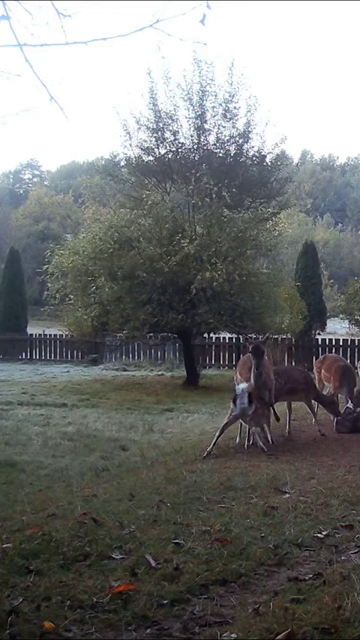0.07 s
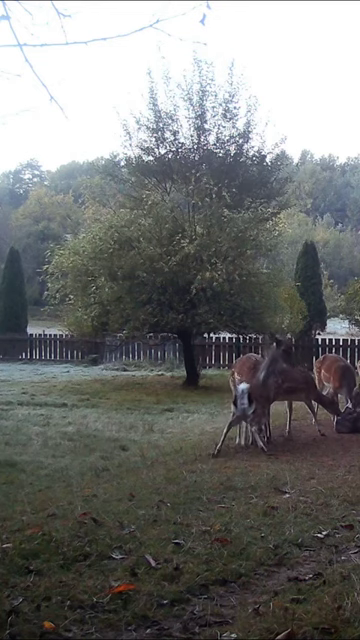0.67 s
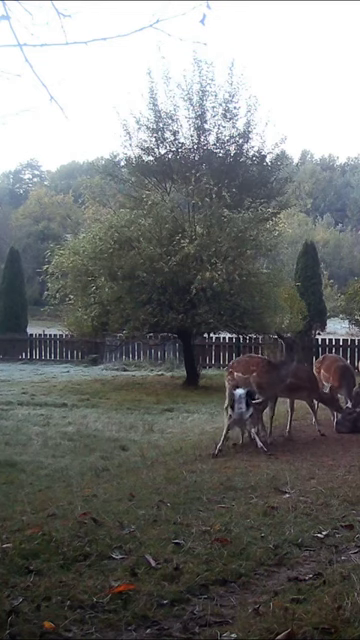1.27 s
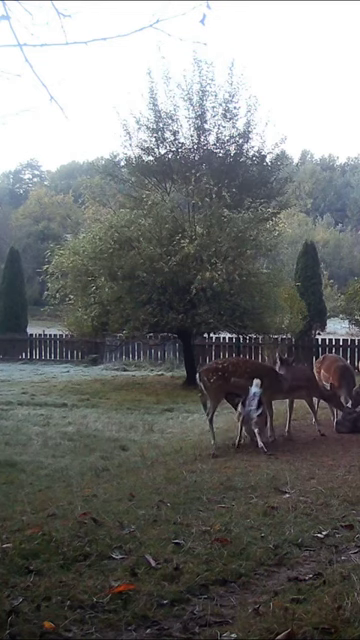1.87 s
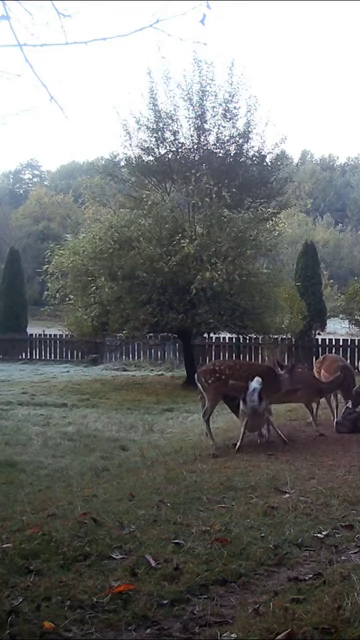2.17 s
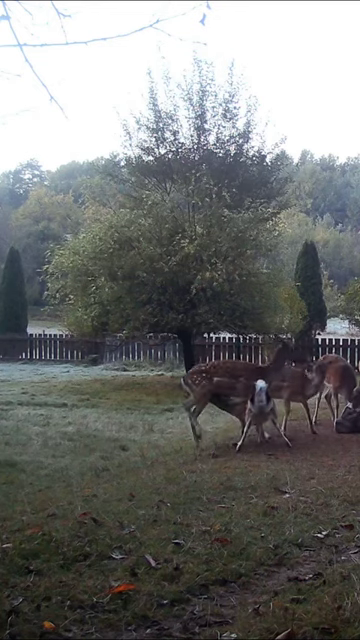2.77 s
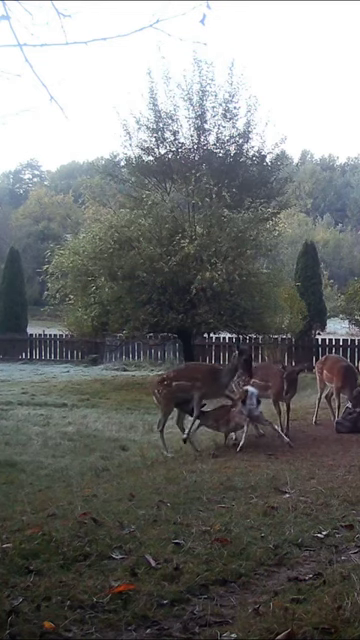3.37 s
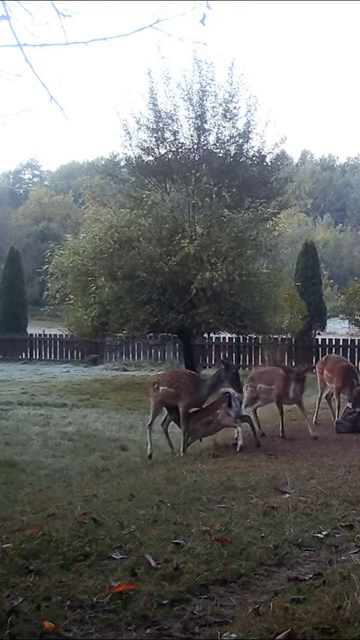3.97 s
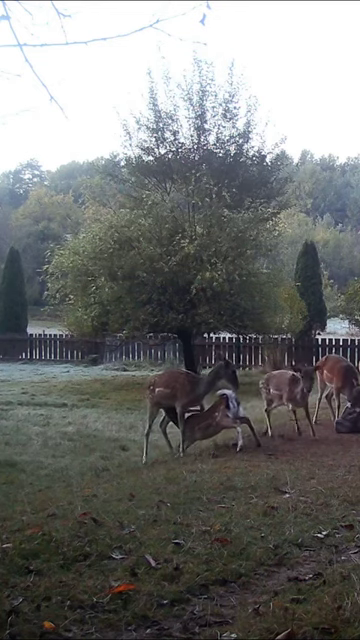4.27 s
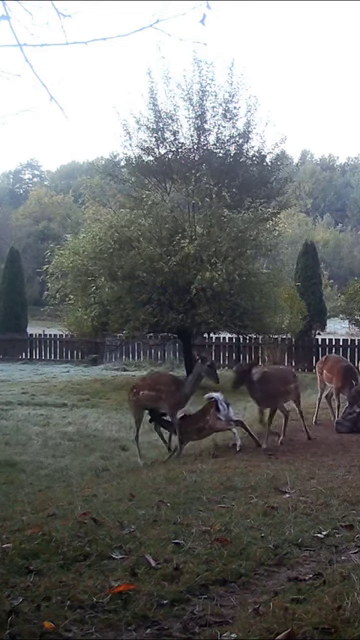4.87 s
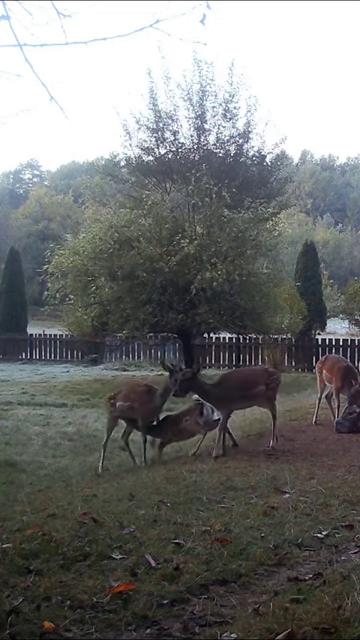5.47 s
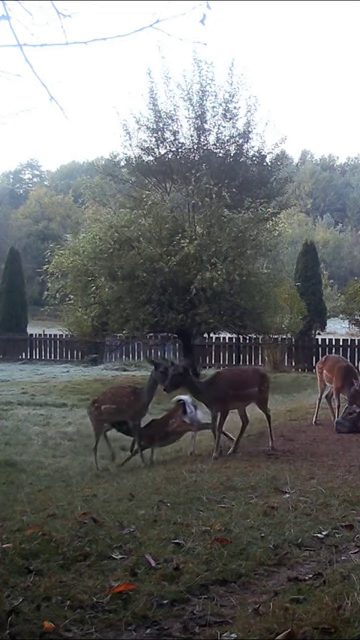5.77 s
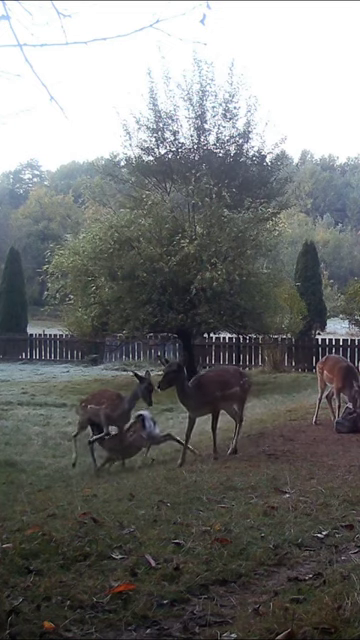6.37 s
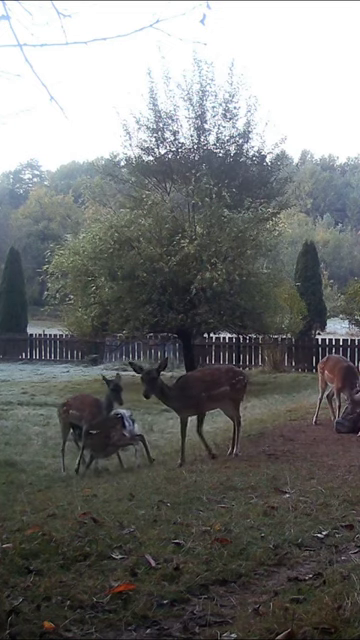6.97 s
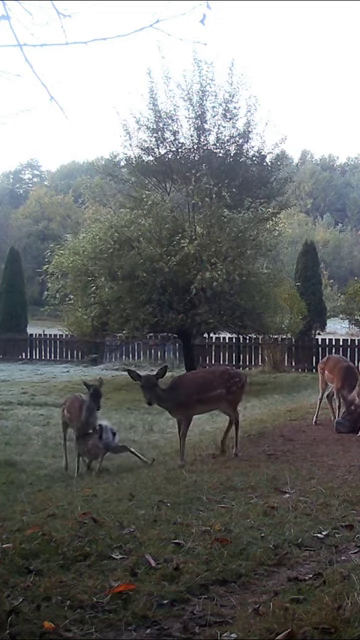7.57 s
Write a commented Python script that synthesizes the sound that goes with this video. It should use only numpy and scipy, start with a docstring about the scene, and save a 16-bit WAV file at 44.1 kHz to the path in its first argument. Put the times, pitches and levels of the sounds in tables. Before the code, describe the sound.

The mono sound fades in during the first second on a still yard: even microphone hiss, distant air and a barely audible high whine. Soft, low thumps from handling and light air on the camera come irregularly, all near one deep pitch, with a slight rumble between them. They are the loudest element, strongest at about 1.7 and 2.2 seconds, continue until 5.4, then weaken and end by 7. Small birds sound faintly from the trees: two quick calls stepping down three notes at 0.5 and 0.7 seconds, and single thin peeps until about 2.4. More peeps and two more stepping calls come between 4.5 and 5.3 seconds. From 5.4 to 6 seconds one bird sings a slightly louder phrase of about seven quick, high, falling notes, echoing lightly off the fence and trees. The hiss carries on to the end, around 7.5 seconds.

```python
"""A hand-held camera throbs softly as handling and light air bump its one low resonance.
Around it lies a still morning on a grassy yard: distant air, even microphone hiss, a faint whine.
Small birds peep and call from the trees in gliding whistles, and late on one sings a short phrase
of falling notes that echoes off the fence and the wood. The scene is mono and fades in."""
import sys
import numpy as np
from scipy import signal
from scipy.fft import rfft, irfft, next_fast_len
from scipy.io import wavfile
from scipy.ndimage import uniform_filter1d, map_coordinates

SR = 44100
rng = np.random.default_rng(int(sys.argv[2]) if len(sys.argv) > 2 else 0)


def unload_wav(signal):
    """Save mono or channel-first audio to the path in sys.argv[1] as 16-bit WAV at rate SR, clipped to [-1, 1]."""
    wavfile.write(
        sys.argv[1],
        SR,
        np.round(np.clip(np.atleast_2d(signal).T, -1, 1) * 32767).astype(np.int16),
    )


N = 340893


def amp(db):
    """Decibels to gain."""
    return 10 ** (np.asarray(db) / 20)


def unit(x):
    """Scale to rms 1."""
    return x / np.sqrt(np.mean(x ** 2) + 1e-20)


def along(points, hz):
    """Read a curve of (freq_hz, value) points on a log frequency axis."""
    freqs, values = np.transpose(points)
    return np.interp(np.log(hz + 1), np.log(freqs + 1), values)


def filtered(x, response):
    """EQ x with a gain given as a function of frequency."""
    size = next_fast_len(N + SR // 2)
    return irfft(rfft(x, size) * response(np.fft.rfftfreq(size, 1 / SR)), size)[:N]


def noise(spectrum):
    """Noise of rms 1 with the given colour."""
    return unit(filtered(rng.standard_normal(N), lambda hz: amp(along(spectrum, hz))))


def wobble(rate_hz):
    """A smooth random curve with rate_hz knots a second."""
    knots = rng.standard_normal(int(N * rate_hz / SR) + 4)
    return map_coordinates(knots, [np.arange(N) * rate_hz / SR])


def add(track, start_s, sound):
    """Mix a sound into the track from start_s."""
    i = round(start_s * SR)
    lo, hi = max(i, 0), min(i + len(sound), N)
    track[lo:hi] += sound[lo - i:hi - i]


def background(air_db=-67, hiss_db=-63.0, drift_hz=3):
    """The bed: distant outdoor air, microphone hiss and a faint, drifting whine of the electronics."""
    # colours of the air and the hiss: freq_hz, relative_db
    air_colour = [(10, -10), (20, 7.5), (40, 7), (74, 12), (95, 4.5), (115, -5.5), (250, -4), (450, -5),
                  (900, -9), (1800, -16), (4000, -30), (8000, -44)]
    hiss_colour = [(100, -7.5), (500, -0.5), (1500, 0), (2900, -0.5), (4100, -0.95), (5200, -1.5),
                   (10300, -3), (12500, -3.5), (13800, -2), (15000, -5.5), (15600, -10)]
    # tones of the whine: pitch_hz, rms_db
    whine_tones = [(11100, -95), (11192, -84.5), (11219, -87)]
    air = amp(air_db + 0.25 * wobble(3.3)) * noise(air_colour)
    hiss = amp(hiss_db + 0.18 * wobble(6.5)) * noise(hiss_colour)
    whine = np.zeros(N)
    for hz, db in whine_tones:
        phase = 2 * np.pi * np.cumsum(hz + drift_hz * wobble(20)) / SR
        whine += amp(db) * unit(np.sin(phase))
    return air + hiss + whine


def bump_pulses(bump_hz=74.6, rebound_hz=71.54, scatter_hz=3.25):
    """Each bump and the grip's rebound, as rows of peak_s, level_db, pitch_hz, rise_s, fall_s."""
    # soft bumps on the camera: peak_s, level_db, rise_s, rebound_db (relative to the bump)
    bumps = [(.125, -38.5, 0.022, -1.5), (.38, -34, 0.016, -25), (.532, -47.5, .03, -15),
             (.96, -39, 0.023, -15.5), (1.302, -50, 0.02, -20), (1.528, -51, .014, -21),
             (1.699, -26, 0.018, -4.5), (2.014, -39, 0.028, -11), (2.157, -29.5, .016, -1),
             (2.403, -33, 0.011, -10), (2.456, -35.5, .02, -14), (2.63, -51.5, 0.046, -9),
             (2.84, -33.5, .015, -8.5), (3.211, -44.5, 0.038, -2), (3.341, -34, .018, -15),
             (3.398, -42, 0.01, -18), (3.643, -33.5, 0.019, -15.5), (4.183, -46, .024, -22),
             (4.341, -33.5, .016, -10), (4.665, -34, 0.022, -13), (4.915, -44.5, 0.021, 1),
             (5.078, -34.5, 0.015, -7), (5.136, -40, 0.017, -14), (5.221, -38, 0.028, -6.5),
             (5.39, -43, .019, -3.5), (6.095, -43.5, .024, -11.5), (6.437, -47.5, .015, -4),
             (6.495, -44, .022, -15), (6.6, -47.5, 0.016, -17), (6.91, -54.5, 0.017, -11)]
    rebound_delay_s, rebound_rise_s, rebound_fall_s = 0.097, 0.02, 0.044
    pulses = []
    for s, db, rise_s, rebound_db in bumps:
        hz, grip_hz = np.array([bump_hz, rebound_hz]) + scatter_hz * rng.standard_normal(2)
        pulses.append((s, db, hz, rise_s, 1.11 * rise_s))  # dies about as fast as it swells
        pulses.append((s + rebound_delay_s, db + rebound_db, grip_hz, rebound_rise_s, rebound_fall_s))
    return pulses


def handling(throb_db=0.23, shiver_db=-46, rumble_db=-61,
             body_hz=72, width_hz=14, low_cut_hz=54, linger_s=0.18):
    """Bumps swell and die in the camera's low resonance; a shiver and a rumble linger around them."""
    # broad rumble under the bumps: freq_hz, relative_db
    rumble_colour = [(15, 3), (30, 5.5), (60, -10), (105, 1), (135, -4.5), (185, -5), (260, -14.5),
                     (500, -43)]
    ring, force = np.zeros(N), np.zeros(N)
    t = np.arange(-SR // 4, SR // 4) / SR
    for peak_s, db, hz, rise_s, fall_s in bump_pulses():
        rise = np.exp(-.5 * (t / rise_s) ** 2)
        ring_down = 1 / np.cosh(1.24 * t / fall_s)
        swell = amp(db) * np.where(t < 0, rise, ring_down)
        phase = rng.uniform(0, 2 * np.pi)
        add(ring, peak_s + t[0], swell * np.cos(2 * np.pi * hz * t + phase))
        add(force, peak_s + t[0], swell)
    ring = filtered(ring, lambda hz: 1 - 1 / (1 + (hz / low_cut_hz) ** 20))  # the microphone's low cut
    unrest = np.abs(uniform_filter1d(force, int(linger_s * SR)))
    unrest /= unrest.max()
    shiver = unit(filtered(rng.standard_normal(N), lambda hz: 1 / (1 + ((hz - body_hz) / width_hz) ** 4)))
    lumps = amp(3.5 * wobble(14))
    rumble = unrest ** 0.44 * unit(lumps * noise(rumble_colour))  # grows more slowly than the bumps
    return amp(throb_db) * ring + amp(shiver_db) * unrest * shiver + amp(rumble_db) * rumble


def whistle(length_s, pitches_hz, roughness, flutter, attack=0.54, release=0.44):
    """One note swells in and glides through its pitches; flutter in the syrinx roughens it."""
    progress = np.linspace(0, 1, max(int(length_s * SR), 8))
    contour = np.polyfit(np.linspace(0, 1, len(pitches_hz)), pitches_hz, len(pitches_hz) - 1)
    shake = roughness * flutter[:len(progress)]
    glide_hz = np.polyval(contour, progress) * (1 + 0.061 * shake)
    arch = progress ** attack * (1 - progress) ** release
    swell = arch / arch.max() * amp(2.3 * shake)
    return swell * np.sin(2 * np.pi * np.cumsum(glide_hz) / SR)


def birds(notes):
    """Whistle rows of start_s, length_s, two or three of pitch_hz, level_db, roughness onto a track."""
    track, flutter = np.zeros(N), wobble(500)
    for start_s, length_s, *pitches_hz, db, roughness in notes:
        add(track, start_s, amp(db) * whistle(length_s, pitches_hz, roughness, flutter[int(start_s * SR):]))
    return track


def peep_notes(length_s=.056, sag=.014):
    """Single thin peeps that droop a little in pitch."""
    # peeps from the trees: start_s, pitch_hz, relative_db, roughness (0-1)
    peeps = [(.285, 4050, -62, 0.03), (.803, 4030, -61, .05), (.995, 4220, -67.5, 0.6),
             (1.465, 4060, -69, .05), (2.36, 4050, -67, .13), (4.515, 2900, -68, .4),
             (5.07, 8080, -59.5, 0.4), (5.27, 7900, -63.5, .5)]
    return [(s, length_s, hz, hz * (1 - sag), db, roughness) for s, hz, db, roughness in peeps]


def step_call_notes():
    """A quick call that steps down three notes."""
    # each call: start_s, relative_db
    calls = [(.485, -60.5), (.715, -60), (4.851, -59.5), (5.075, -55.5)]
    # its notes: offset_s, length_s, start_hz, end_hz, step_db (relative to the call), roughness (0-1)
    steps = [(0, .045, 4600, 4440, -6, 0.69), (0.013, .021, 4020, 3960, -4.5, 0.4),
             (.038, 0.0533, 3480, 3350, 1, .12)]
    return [(s + offset_s, length_s, start_hz, end_hz, db + step_db, roughness)
            for s, db in calls for offset_s, length_s, start_hz, end_hz, step_db, roughness in steps]


def tree_reverb(x, predelay_s=.012):
    """Trunks and leaves scatter the birds into a thin tail."""
    # decay among the trees: freq_hz, t60_s
    decay_times = [(3000, 0.49), (8000, 0.73)]
    hz, t, spectrum = signal.stft(rng.standard_normal(SR), SR, nperseg=256)
    decay = amp(-60 * t / along(decay_times, hz)[:, None])
    tail = signal.istft(spectrum * decay, SR, nperseg=256)[1]
    delayed = np.pad(x, (int(predelay_s * SR), 0))
    return signal.fftconvolve(delayed, tail / np.linalg.norm(tail))[:N]


def song_notes(sag_hz_per_s=5200, floor_hz=3086, bow_hz=90,
               overlap_s=.003, flick_db=1.5, flick_roughness=.15):
    """Each whistle sags at the same rate; most end in a flick to the bottom of the bird's range."""
    # syllables: start_s, whistle_s, flick_s, start_hz, relative_db, roughness (0-1)
    syllables = [(5.413, 0.05, .013, 3760, -53, 0.39), (5.474, .052, 0.0022, 3196, -53, 0.25),
                 (5.628, 0.033, 0, 4140, -57, 0.9), (5.651, .033, .028, 3973, -48.5, 0.36),
                 (5.787, .026, 0.013, 4030, -52.5, 0.1), (5.891, .023, .007, 4200, -54.5, 0.2),
                 (6.0, 0.03, 0, 3930, -56, .12)]
    notes = []
    for s, whistle_s, flick_s, hz, db, roughness in syllables:
        knee_hz = hz - sag_hz_per_s * whistle_s
        notes.append((s, whistle_s, hz, knee_hz, db, roughness))
        if flick_s > 0:
            middle_hz = (knee_hz + floor_hz) / 2 + bow_hz  # bowed, so the dive steepens
            start_s = s + whistle_s - overlap_s
            notes.append((start_s, flick_s, knee_hz, middle_hz, floor_hz, db + flick_db, flick_roughness))
    return notes


def slapback(song):
    """The song bounces off the fence and the wood's edge."""
    # distinct reflections: delay_s, gain_db
    reflections = [(.025, -11), (.165, -16.5)]
    return sum(amp(db) * np.pad(song, (int(delay_s * SR), 0))[:N] for delay_s, db in reflections)


def scene():
    """Camera throb, bed and birds reach one microphone, which feeds both channels."""
    calls = birds(peep_notes() + step_call_notes())
    song = birds(song_notes())
    direct = amp(-3.5) * calls + amp(-1.0) * song
    reverb_send = amp(-7.5) * calls + amp(-6.0) * song
    mono = handling() + background() + direct + slapback(song) + tree_reverb(reverb_send)
    return np.array([mono, mono])


def record(dry, start_s=0.072, fade_s=0.76, top_hz=15720):
    """The camera fades in and keeps nothing above its band limit."""
    fade_in = np.clip((np.arange(N) / SR - start_s) / fade_s, 0, 1)
    return np.array([filtered(fade_in * channel, lambda hz: hz < top_hz) for channel in dry])


dry = scene()
out = record(dry)
unload_wav(out)
```